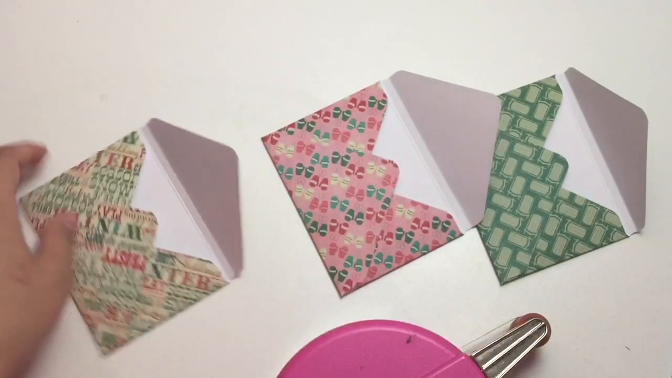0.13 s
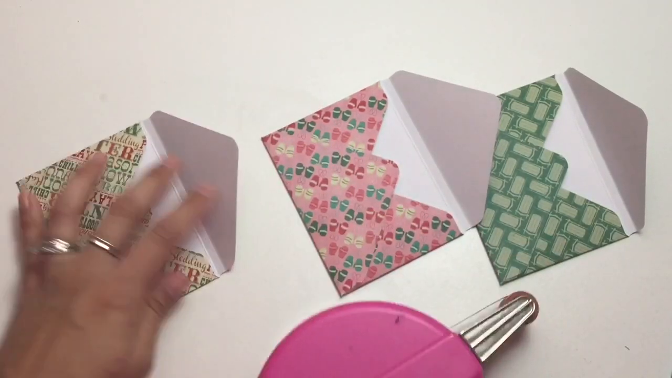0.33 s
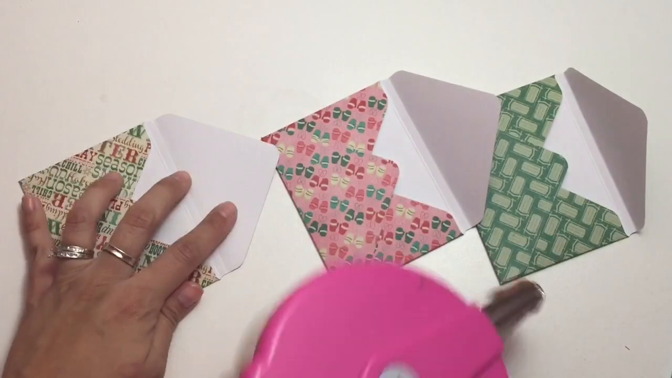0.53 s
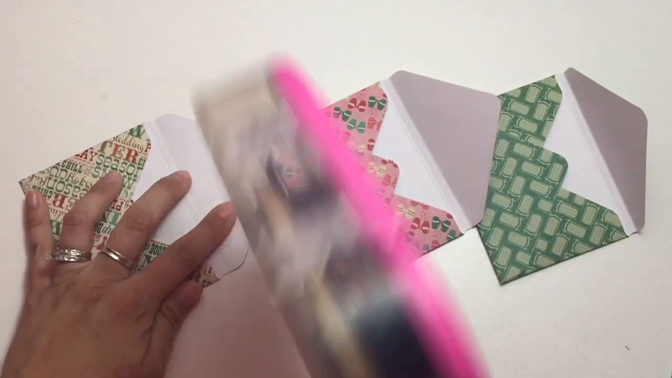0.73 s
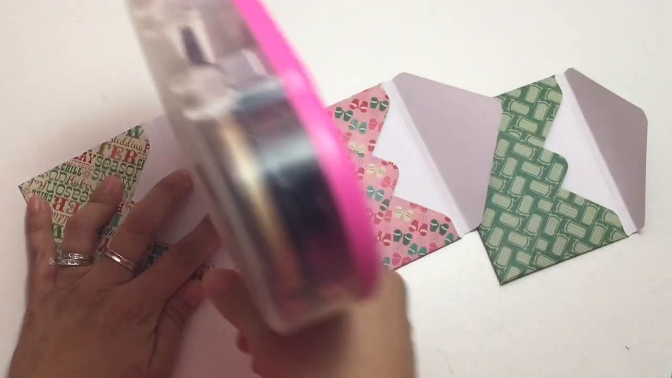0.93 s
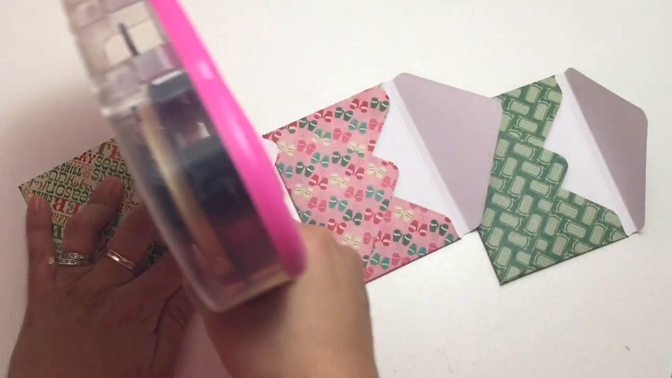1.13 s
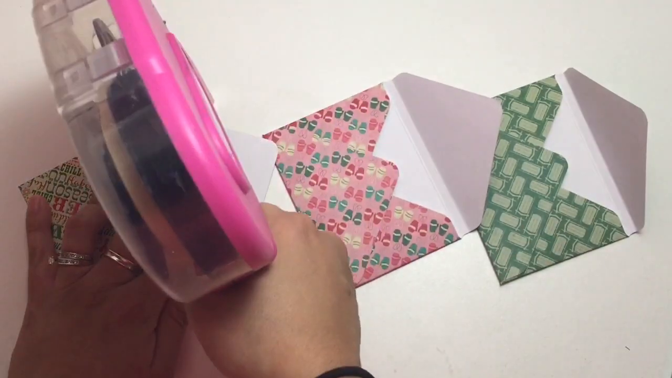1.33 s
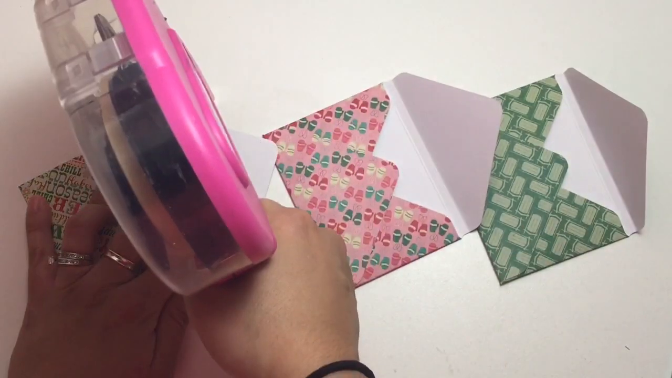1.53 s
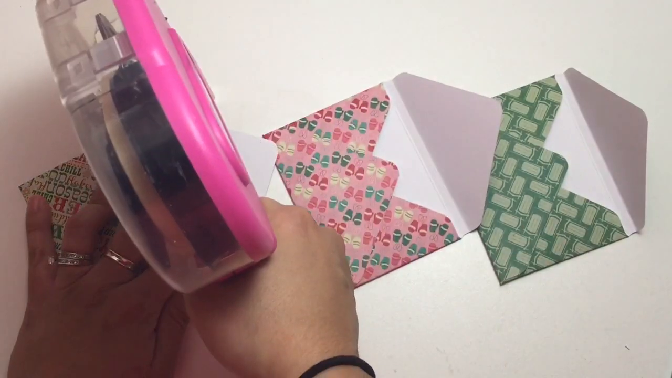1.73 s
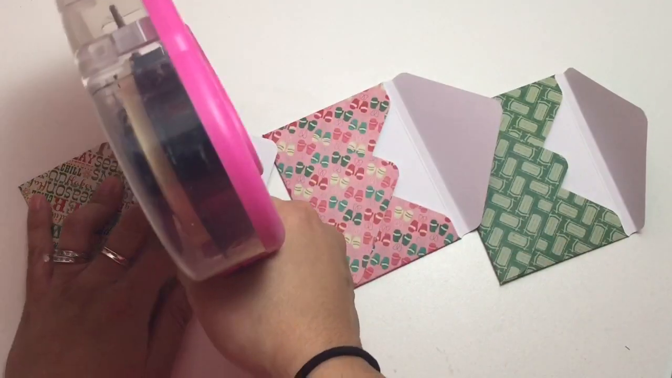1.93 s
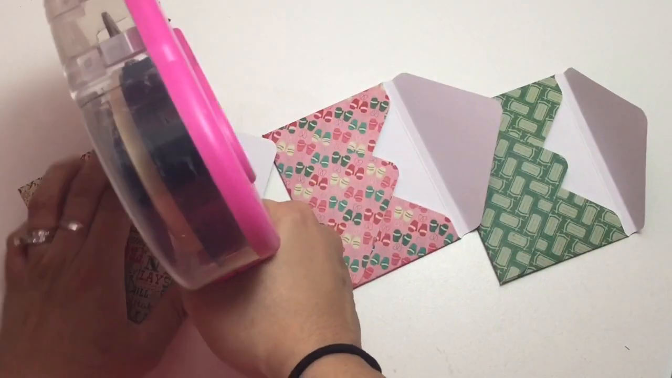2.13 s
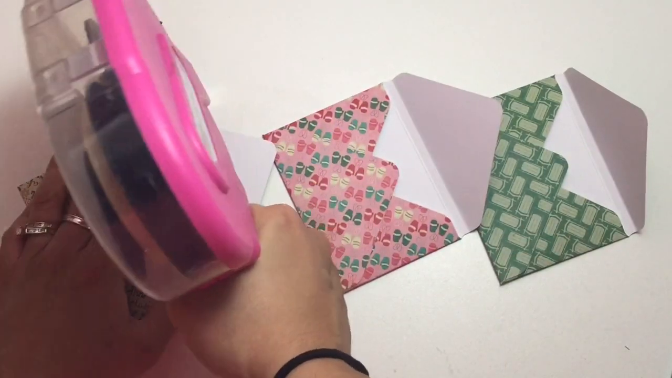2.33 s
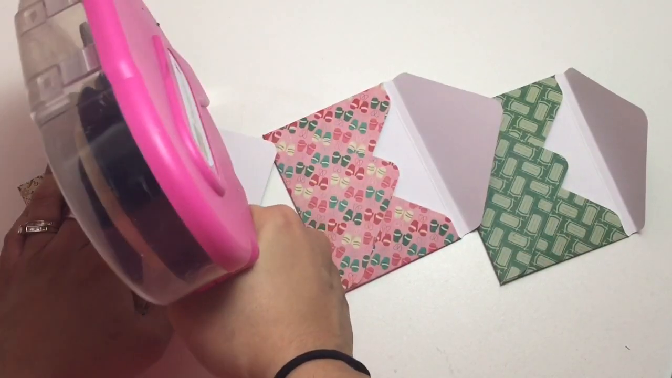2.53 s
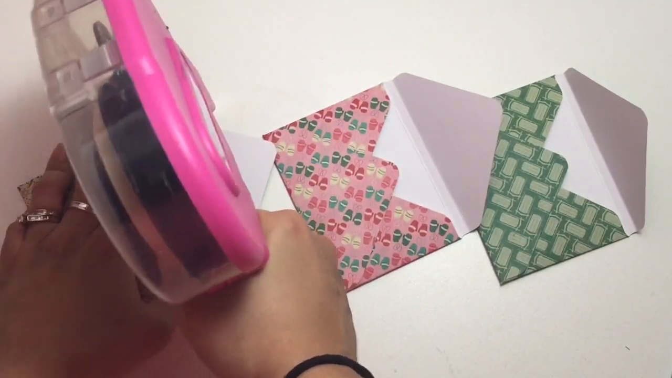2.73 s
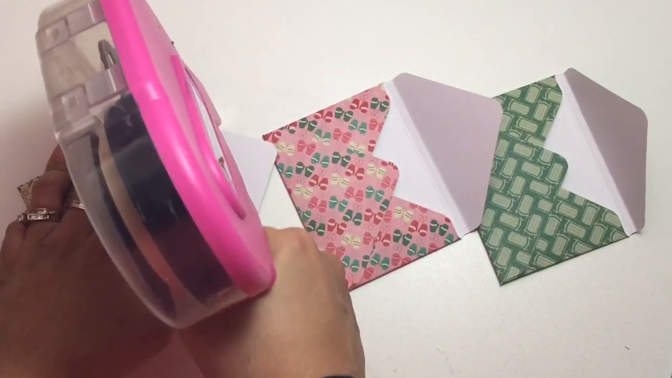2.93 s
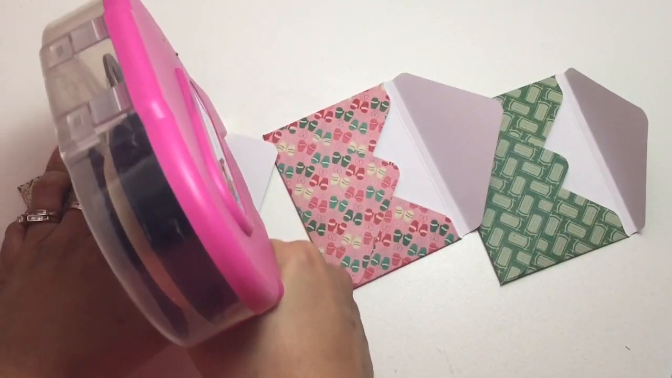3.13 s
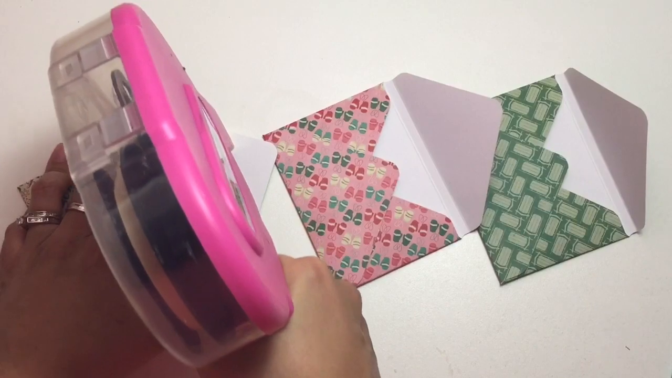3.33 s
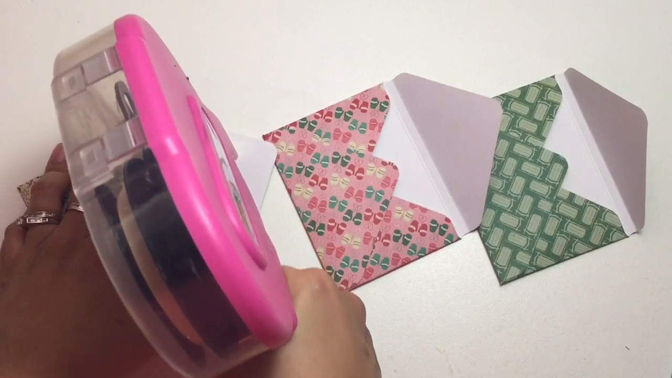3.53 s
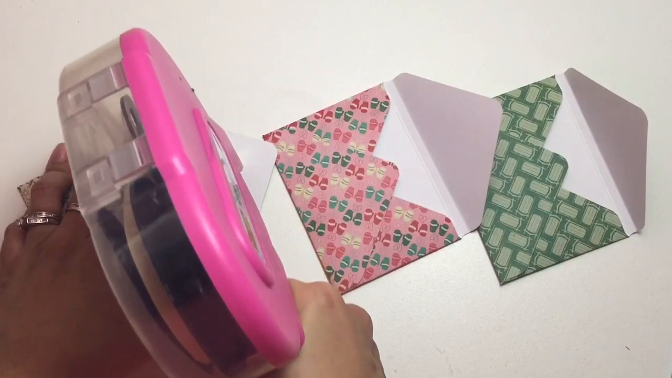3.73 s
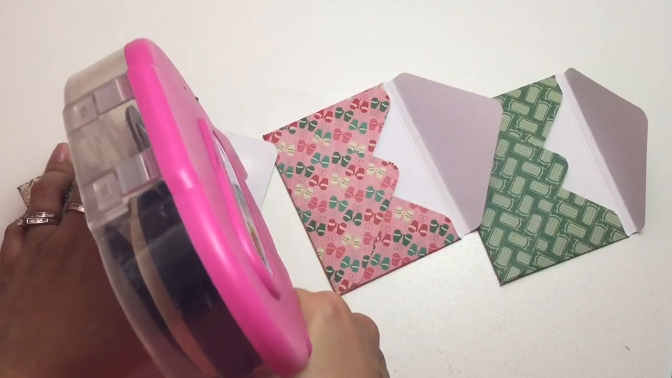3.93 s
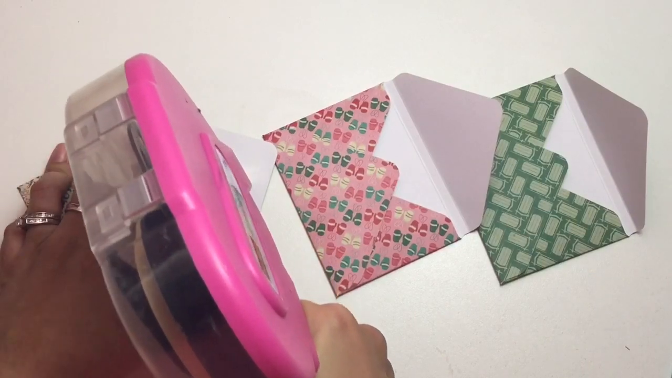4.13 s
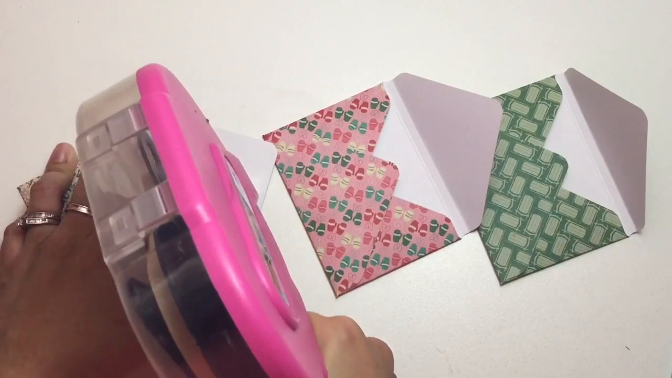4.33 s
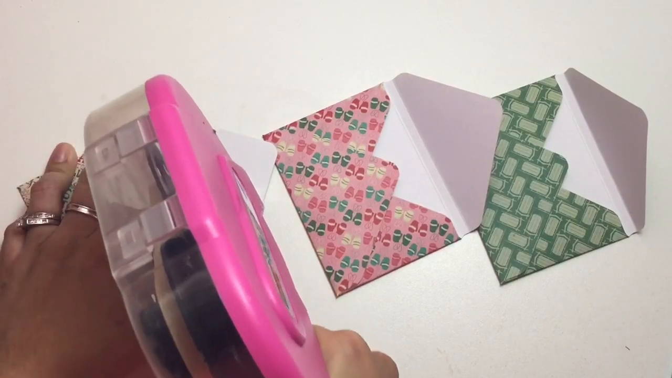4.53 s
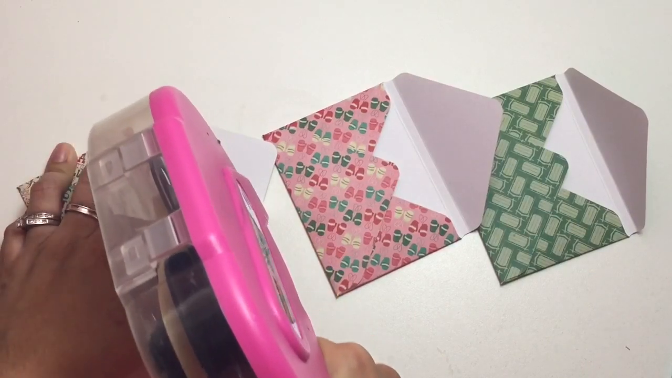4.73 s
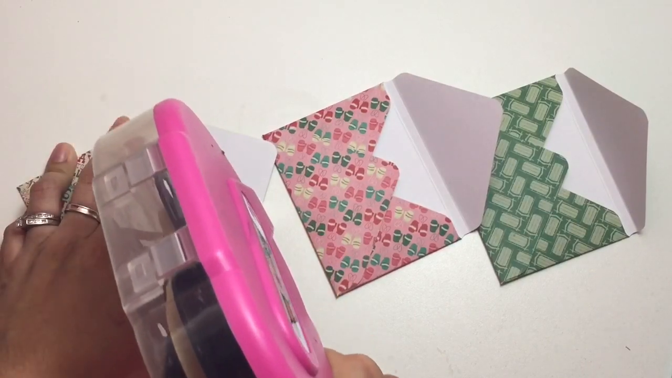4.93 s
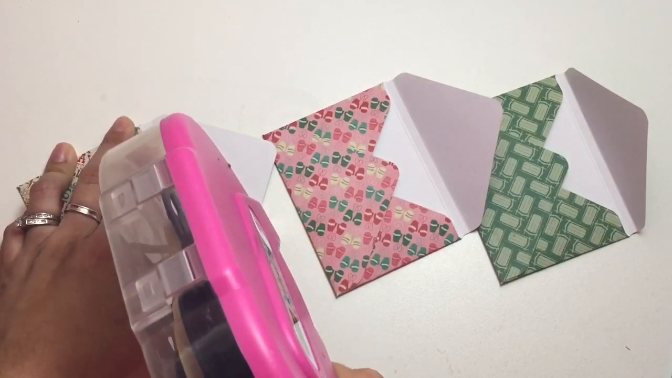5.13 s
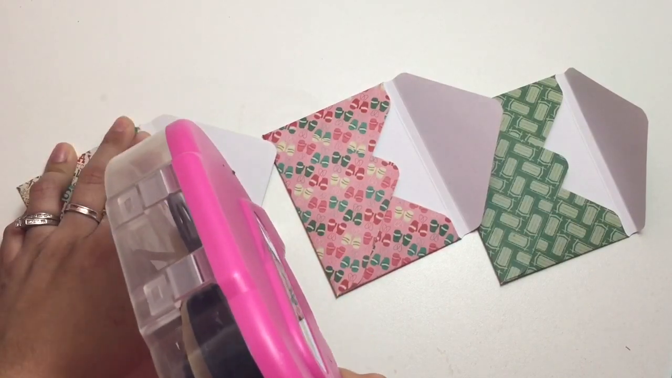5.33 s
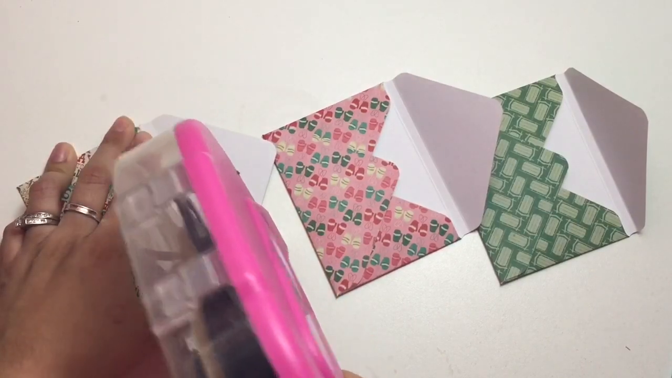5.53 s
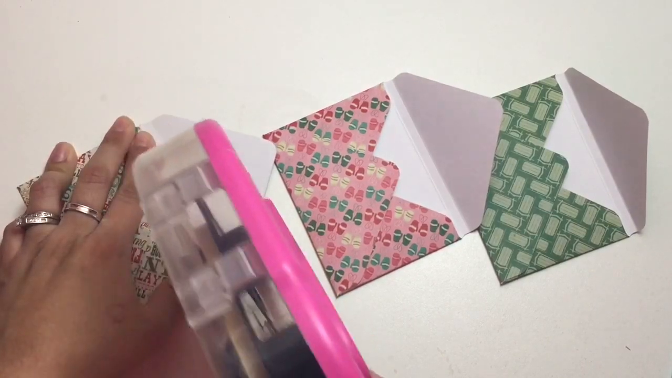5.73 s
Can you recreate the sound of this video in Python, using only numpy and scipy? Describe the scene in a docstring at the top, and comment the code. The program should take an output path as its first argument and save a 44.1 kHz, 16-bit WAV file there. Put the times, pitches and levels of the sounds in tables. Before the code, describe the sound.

Light plastic clatter and paper rustle open the sound as a tape dispenser is lifted off a table. A near-silent pause leads to soft rubbing and a knock. The dispenser is then drawn along an envelope, its sticky film peeling away in a run of crisp snaps over a rattling spool and small squeaks. It finishes with one loud hollow clack, heard through a single microphone in a small quiet room.

```python
"""Tape gun on an envelope

A plastic tape gun is lifted from a craft table, set on a paper envelope and pulled along the flap.
Its nose judders, then the glue film leaves its liner in bright snaps while the spool chatters and squeaks.
The hollow gun and the table top ring at each knock; fingers and paper rub. Small quiet room, one mic."""
import sys
import numpy as np
from scipy import signal
from scipy.fft import rfft, irfft, next_fast_len
from scipy.io import wavfile
from scipy.ndimage import uniform_filter1d

SR = 44100
rng = np.random.default_rng(int(sys.argv[2]) if len(sys.argv) > 2 else 0)


def pcm_store(signal):
    """Save signal as 16-bit PCM."""
    levels = np.round(np.clip(np.atleast_2d(signal), -1, 1) * 32767)
    wavfile.write(sys.argv[1], SR, levels.astype(np.int16).T)


N = 258999
T = np.arange(N) / SR

# a brief paper scrape at 0.272 s, then the louder snaps of the glue film:
# start_s, peak_db, deep_db (lower band against the top)
SNAP_CUES = [(0.272, -43, 25), (2.9027, -40, 0), (2.9275, -36, -5), (2.98, -42, -6), (3.0103, -35.5, -16),
             (3.025, -39, -7), (3.083, -41, -13), (3.0986, -37.5, -2), (3.2015, -25, 3), (3.2218, -30, -32),
             (3.24, -35, -15), (3.2939, -28, -7), (3.359, -29.5, -6), (3.4032, -28, -10),
             (3.453, -34.5, -5), (3.526, -33.5, 0.5), (3.6039, -41, -9), (3.7217, -43, -9),
             (3.7586, -32.5, -5), (3.7958, -28, 2.5), (3.8485, -25, -9), (3.8721, -22, -14.5),
             (3.905, -39, 12), (3.9713, -32, 11), (3.9963, -22, 4.5), (4.0451, -22.5, 4.5),
             (4.0516, -29.5, 25), (4.1132, -35, 23), (4.1448, -32, 8), (4.1786, -30, -3), (4.2036, -37, 26),
             (4.2205, -21.5, 17), (4.254, -37.5, 33.5), (4.2981, -27, -5.5), (4.3736, -26, -12),
             (4.5352, -29, 5.5), (4.551, -27, 3), (4.557, -26, 2), (4.5782, -29, 11), (4.6049, -32, 6),
             (4.699, -29, -9), (4.708, -36.5, 20.5), (4.7627, -32.5, 0), (4.781, -40, -16),
             (4.8295, -21.5, 1), (4.8574, -35, -6), (4.9132, -23, -7), (4.928, -31, -21), (4.9482, -19, -2),
             (4.9644, -27, -5.5), (4.996, -40, -12), (5.005, -31.5, -4.5), (5.0459, -22.5, -0.5),
             (5.0983, -24, 1.5), (5.1312, -39, 4), (5.1926, -25.5, 3.5), (5.222, -36, -5), (5.2439, -23, 2),
             (5.3442, -24, 4.5), (5.3529, -20.5, -1), (5.4107, -32, -11), (5.432, -36, -8),
             (5.438, -35.5, -12), (5.7447, -30, -19), (5.7565, -32, 1), (5.7993, -32, -1.5)]
# gun, rings and fingers meeting table or paper: start_s, level_db, sharp_db, thud_db (both re level)
KNOCK_CUES = [(0.0, -30, -2, -44), (0.02, -22, 0.5, -21.5), (0.299, -30, -7.5, -8), (0.365, -42, -3.5, 9),
              (0.399, -34.5, -18, -12), (0.463, -30.5, -11.5, -0.5), (0.484, -33.5, -15, -34),
              (0.61, -34, -12.5, -19), (0.626, -28, -15, -32), (0.659, -38.5, -3.5, -25),
              (0.735, -46, -3, -31), (0.779, -36.5, -12.5, -38), (0.823, -37, -7.5, -42),
              (0.848, -25.5, -2, -58), (0.932, -45.5, -14, -25), (1.471, -38, -3, -41),
              (2.561, -22, -4.5, -17.5), (2.933, -39.5, -3, -10.5), (3.244, -32.5, -3, -40),
              (3.606, -41, -2.5, -37), (5.681, -22, -0.5, -46), (5.697, -11.5, -8.5, -9.5)]
# handling while the film is still: start_s, length_s, table_push_db, creak_push_db, rustle_db
STROKES = [(0.116, 0.16, -59.5, -60.5, -56), (0.306, 0.17, -42, -41, -61), (0.471, 0.08, -42.5, -66, -55),
           (0.722, 0.29, -97, -50.5, -76), (1.987, 0.039, -73, -60, -70.5), (2.068, 0.07, -45.5, -65, -62),
           (2.143, 0.093, -49, -53, -56), (2.253, 0.038, -40.5, -71, -52), (2.287, 0.022, -40, -70, -55),
           (2.312, 0.024, -62, -61.5, -61.5), (2.526, 0.17, -51, -45.5, -72.5),
           (5.677, 0.16, -42, -41.5, -58.5)]
# the pull along the flap: time_s, drag_db, fizz_db
PULL_CURVE = [(2.86, -53.5, -76), (2.94, -39, -60), (3.06, -53.5, -71), (3.22, -47, -59.5),
              (3.399, -48.5, -59.5), (3.599, -57.5, -76), (3.72, -56.5, -61.5), (3.901, -65, -53.5),
              (4.048, -53.5, -60.5), (4.22, -50, -54), (4.351, -60, -70), (4.448, -63.5, -71),
              (4.6, -53.5, -53.5), (4.749, -59, -68), (4.87, -54, -72), (5.05, -51, -56.5),
              (5.35, -64.5, -63), (5.478, -61, -74)]
# about once a spool turn the gun sticks, then lurches on: middle_s, push_db
LURCH_CUES = [(3.828, -41.5), (4.554, -50.5), (5.172, -47)]
# two shoves of the nose over the paper: middle_s, half_width_s, gain_db
SHOVES = [(2.713, 0.022, -54.5), (2.794, 0.058, -52.5)]
# the spool squeaking on its axle: start_s, peak_db
SQUEAK_CUES = [(4.6169, -36), (4.7828, -48.5), (5.004, -45.5), (5.412, -46)]
# modes of the taut liner: pitch_hz, gain_db, t60_s
LINER_MODES = [(3590, -3, .025), (4300, 0, .025), (5490, -2, .02), (6650, -5, .018)]
# modes of the hollow gun: pitch_hz, gain_db, t60_s
GUN_MODES = [(393.9, -4, 0.095), (528.5, -5.5, 0.064), (612, 0.5, 0.038), (1046, -6, 0.032),
             (1180, -4.5, 0.055), (1327, -6.5, 0.056), (1683, 9, 0.016), (2037, 2, 0.031),
             (2367, 7.5, 0.014), (3370, 13.5, 0.0052)]
# modes of the spool: pitch_hz, gain_db, t60_s
SPOOL_MODES = [(618.5, -1.5, 0.049), (1078, 1.5, 0.011), (1710, -4.5, 0.03)]
# modes of the table top: pitch_hz, gain_db, t60_s
TABLE_MODES = [(70.4, 7.5, 0.08), (123.1, 2, 0.24), (211, -3.5, 0.19)]
# bright tone of the film, with the microphone's dip near 10.5 kHz: frequency_hz, gain_db
FILM_EQ = [(1290, -30), (2200, -12), (4130, -7.5), (5700, -2), (9170, -0.5), (10500, -5), (13800, -1),
           (16000, 0.5)]
# tone of rubbed paper: frequency_hz, gain_db
PAPER_EQ = [(900, -15), (1600, 2.5), (2600, 7.5), (5500, 2), (9000, -2), (16000, -5.5)]
# bass-heavy room tone: frequency_hz, gain_db
AIR_EQ = [(18, -47), (30, -2.5), (86, -9.5), (124, -11.5), (554, -24), (1540, -28.5), (2120, -27),
          (3060, -30), (16000, -40)]

PULL_START_S, PULL_END_S = PULL_CURVE[0][0], PULL_CURVE[-1][0]
PULLING = (T >= PULL_START_S) & (T < PULL_END_S)
SMALL_SNAPS_PER_S, JUDDER_HZ = 75, 238
HELD_FROM_S, LURCH_S = 1.1, 0.11


def snaps():
    """Glue lets go in fizzy cracks that ring the liner and tap the gun; the first cue is a paper scrape."""
    t, out = T[:SR // 16], np.zeros(N)
    # small snaps fall at random and ride above the fizz
    _, fizz_db = pull_levels()
    pull_s = PULL_END_S - PULL_START_S
    place, size = rng.random((int(SMALL_SNAPS_PER_S * pull_s), 2)).T
    when = PULL_START_S + pull_s * place
    small_db = fizz_db[(when * SR).astype(int)] + 11 + 10.5 * size
    small = [(s, db, -11) for s, db in zip(when, small_db)]
    envelope = (undb(6) * fade(t, 0.0022) + fade(t, 0.03) + undb(-17.5) * fade(t, 0.15)) * rise(t, 0.00068)
    for s, db, deep_db in [*SNAP_CUES, *small]:
        burst = noise(len(t)) * envelope
        deep = unit(cut(burst, 6470, "low", order=4))
        thin = unit(cut(burst, 8800, "high", order=4))
        film = colour(thin + undb(deep_db) * deep, FILM_EQ)
        add(out, s, buckle(film, spread_db=4.6, count=16), db)
        liner = ring(LINER_MODES, t, noise((2, 16)), scatter_db=7.2)
        add(out, s, liner, db + min(deep_db, 0) - 11)
        tap = ring(GUN_MODES, t, noise((2, 16)), scatter_db=4.5) * rise(t, 0.0025)
        add(out, s, tap, db + deep_db - 28.5)
    return out


def knocks():
    """A rattling contact rings the gun, dense small modes blur into clatter, and the table thuds."""
    t, out = T[:SR // 3], np.zeros(N)
    for s, db, sharp_db, thud_db in KNOCK_CUES:
        hit, tail = noise((2, len(t)))
        spot = noise((2, 16))
        contact = (hit * fade(t, 0.025))[:SR // 50]
        shell = unit(excite(ring(GUN_MODES, t, spot, scatter_db=3.5), contact))
        body = shell + unit(tail * fade(t, 0.039) * rise(t, 0.004))
        # a softer contact closes both bands down
        soft_top_hz = 1760 * 2 ** (sharp_db / 13.3)
        sharp_top_hz = min(5600 * 2 ** (sharp_db / 3) + 1471, SR / 3)
        soft = cut(cut(body, soft_top_hz, "low", order=3), 228, "high")
        sharp = cut(cut(body, 2490, "high", order=3), sharp_top_hz, "low", order=3)
        crack = cut(hit * fade(t, 0.014), [5000, 12000], "band", order=1)
        thud = ring(TABLE_MODES, t, spot, scatter_db=1.5) * rise(t, 0.0036)
        add(out, s, soft, db)
        add(out, s, sharp, db + sharp_db)
        add(out, s, crack, db + 2.14 * sharp_db - 11)
        add(out, s, thud, db + thud_db)
    return out


def rubbing():
    """Strokes, drag and lurches stir table, gun and paper; the arm thumps in each lurch."""
    table_push, gun_push, rustle_level = sum(
        undb(levels_db)[:, None] * swell(s, length) ** 1.1 for s, length, *levels_db in STROKES)
    drag, fizz = undb(pull_levels())
    lurch = sum(undb(db) * swell(s - LURCH_S / 2, LURCH_S) ** 2 for s, db in LURCH_CUES)
    table_push += undb(-12) * drag + undb(-10) * lurch
    table = slips(TABLE_MODES, table_push, per_s=80, spread_db=1.2, smear_s=0.025)
    gun = gun_creak(gun_push + drag + undb(6.5) * lurch, lurch)
    surface = rustle() * (rustle_level + fizz)
    thump = lurch * unit(cut(noise(N), 77, "low", order=3))
    return undb(-36) * table + undb(-29.5) * gun + surface + undb(1.5) * thump


def gun_creak(push, lurch):
    """The shell creaks; in the pull the grip tightens on it and the spool chatters and rattles."""
    shell = slips(GUN_MODES, push * np.where(PULLING, 0.4, 1), per_s=80, spread_db=1.8, smear_s=0.012)
    chatter = slips(SPOOL_MODES, push * PULLING, per_s=70, spread_db=1.6, smear_s=0.012)
    rattle = slips(SPOOL_MODES, lurch, per_s=300, spread_db=1, smear_s=0.005)
    return cut(shell, 1050, "low") + undb(0.5) * chatter + undb(1) * cut(rattle, 1450, "low")


def rustle():
    """Tiny slips roughen noise: a papery swish for the strokes, a fine fizz for the unwinding film."""
    ticks = unit(excite(grains(per_s=180, spread_db=2.8), fade(T[:SR // 20], 0.025)))
    crackle = colour((ticks + 0.25) * noise(N), FILM_EQ)
    paper = unit(colour((ticks + 0.82) * noise(N), PAPER_EQ))
    film = unit(colour((ticks + 0.42) * noise(N), FILM_EQ))
    held = undb(18) * paper + film  # a hint of film once the gun is in the hand
    strokes = np.zeros(N)
    for s, length, *_ in STROKES:
        texture = buckle(held if s > HELD_FROM_S else paper, spread_db=2.2, count=30)
        strokes += unit(texture) * (swell(s, length) > 1e-6)
    return np.where(PULLING, unit(cut(crackle, 8800, "high")), strokes)


def nose_judder():
    """Nearly regular stick-slip pulses with grit between; the soft nose dulls them, the table booms."""
    drift = 1 + 0.013 * unit(cut(noise(N), 30, "low"))
    slip_count = np.floor(np.cumsum(JUDDER_HZ / SR * drift))
    pulses = np.diff(slip_count, prepend=0) * undb(2.4 * noise(N))
    grit = unit(pulses) + 1.05 * noise(N)
    nose = noise(SR // 100) * fade(T[:SR // 100], 0.015)
    chatter = unit(cut(excite(grit, nose), [300, 2300], "band"))
    boom = unit(cut(grit, [190, 520], "band"))
    hiss = unit(cut(grit, [5000, 10000], "band"))
    envelope = sum(undb(db) * np.exp(-((T - s) / half_s) ** 4) for s, half_s, db in SHOVES)
    return (chatter + undb(3.5) * boom + undb(-25) * hiss) * envelope


def spool_squeaks():
    """A short scrape on the axle rings the spool's top mode alone."""
    t, out = T[:SR // 10], np.zeros(N)
    for s, db in SQUEAK_CUES:
        scrape = noise(len(t)) * fade(t, 0.029)
        add(out, s, excite(scrape, ring(SPOOL_MODES[-1:], t)), db)
    return out


def room(x):
    """The walls return a short, dull wash over a faint bed of air."""
    t = T[:SR // 2]
    tail = cut(noise(len(t)), 4500, "low", order=1) * fade(t, t60=0.19) * rise(t, 0.0053)
    wash = excite(x, tail / np.sqrt(np.sum(tail ** 2)))
    air = unit(colour(noise(N), AIR_EQ))
    return x + undb(-13) * wash + undb(-66) * air


def slips(modes, push, per_s, spread_db, smear_s):
    """Short scrapes land all over a body, so each mode is stirred at its own moments."""
    out = np.zeros(N)
    for mode in modes:
        roughness = unit(uniform_filter1d(grains(per_s, spread_db), int(smear_s * SR)))
        out += excite(roughness * noise(N) * push, ring([mode], T[:SR // 4]))
    return out


def grains(per_s, spread_db):
    """Irregular tiny slips: a few large among many small."""
    when, size, _ = rng.random((3, N))
    return (when < per_s / SR) * undb(-spread_db * np.log(size + 1e-9))


def ring(modes, t, spot=np.ones((2, 1)), scatter_db=0):
    """One blow on a set of modes; the spot it hits sets each one's strength, sign and slight detune."""
    hz, db, t60 = np.transpose(modes)[:, :, None]
    size, detune = spot[:2, :len(modes), None]
    gain = undb(db + scatter_db * size) * np.sign(detune)
    return np.sum(gain * fade(t, t60) * np.sin(2 * np.pi * hz * (1 + 0.025 * detune) * t), axis=0)


def buckle(x, spread_db, count):
    """Random treble peaks and dips: every patch of film or paper buckles differently."""
    return colour(x, np.c_[np.geomspace(2000, 16000, count), spread_db * noise(count)])


def pull_levels():
    """Drag and fizz in dB, silent outside the pull."""
    s, drag_db, fizz_db = np.transpose(PULL_CURVE)
    return [np.interp(T, s, db, left=-120, right=-120) for db in (drag_db, fizz_db)]


def colour(x, points):
    """EQ a sound through (Hz, dB) points."""
    hz, db = np.transpose(points)
    size = next_fast_len(len(x))
    f = np.maximum(np.arange(size // 2 + 1) * SR / size, 1)
    gain = undb(np.interp(np.log(f), np.log(hz), db))
    return irfft(rfft(x, size) * gain, size)[:len(x)]


def add(out, s, sound, peak_db):
    """Lay a sound into out at s seconds."""
    i = int(s * SR)
    part = sound[:N - i]
    out[i:i + len(part)] += part * undb(peak_db) / np.max(np.abs(sound))


def swell(s, length):
    return np.sin(np.pi * np.clip((T - s) / length, 0, 1))


def rise(t, attack_s):
    return np.minimum(t / attack_s, 1)


def fade(t, t60):
    return np.exp(-np.log(1000) * t / t60)


def excite(x, response):
    return signal.fftconvolve(x, response)[:len(x)]


def cut(x, hz, kind, order=2):
    return signal.sosfilt(signal.butter(order, hz, kind, fs=SR, output="sos"), x)


def noise(shape):
    return rng.standard_normal(shape)


def unit(x):
    return x / np.sqrt(np.mean(x ** 2))


def undb(db):
    return 10 ** (np.asarray(db) / 20)


def scene():
    """All the layers in the room, in mono."""
    return room(snaps() + knocks() + rubbing() + nose_judder() + spool_squeaks())[None]


def record(dry):
    """The microphone drops the deepest bass; the top is cut steeply."""
    top_cut = signal.ellip(8, 0.2, 60, 15900, fs=SR, output="sos")
    return signal.sosfilt(top_cut, cut(dry, 54, "high", order=4))


dry = scene()
out = record(dry)
pcm_store(out)
```